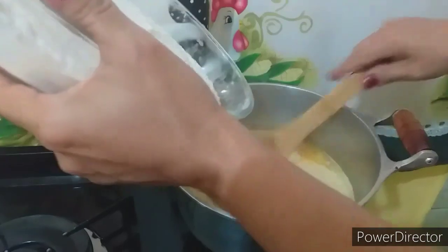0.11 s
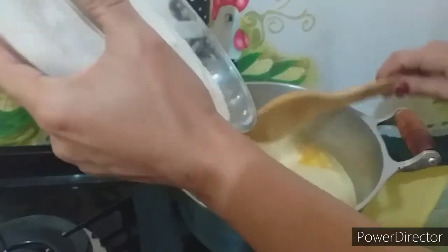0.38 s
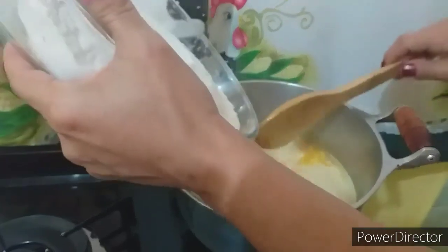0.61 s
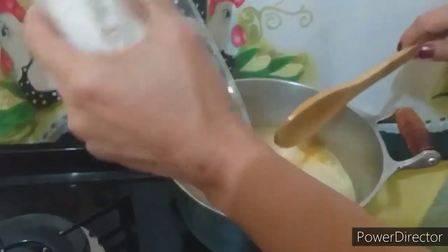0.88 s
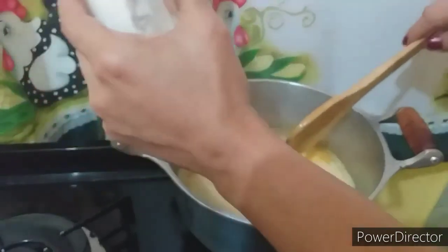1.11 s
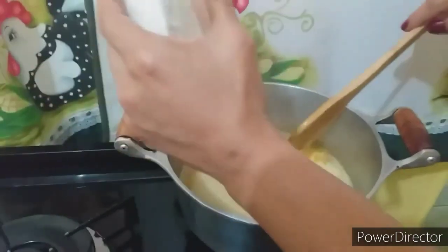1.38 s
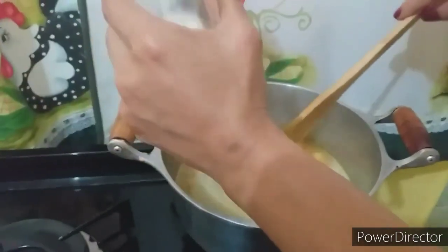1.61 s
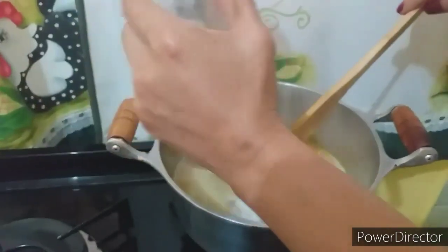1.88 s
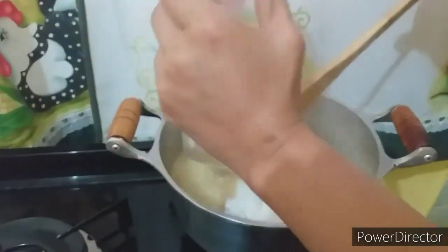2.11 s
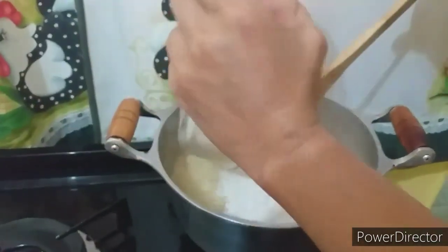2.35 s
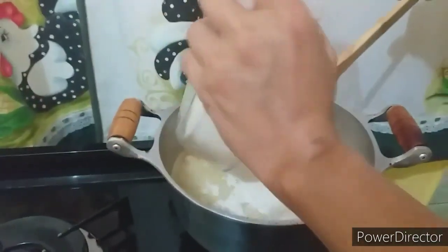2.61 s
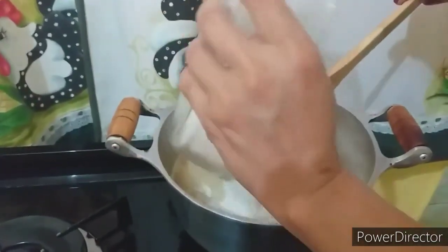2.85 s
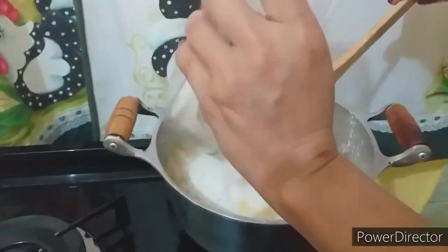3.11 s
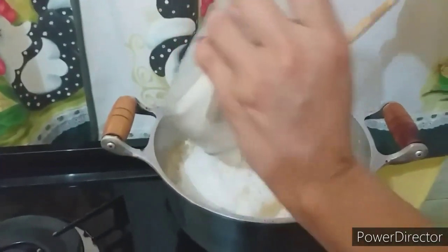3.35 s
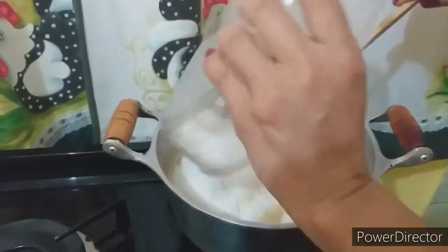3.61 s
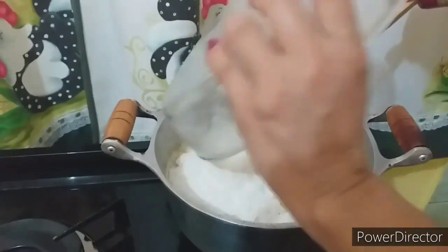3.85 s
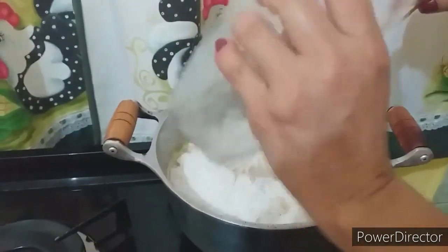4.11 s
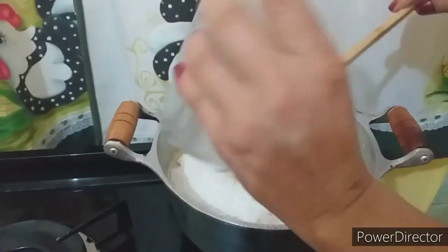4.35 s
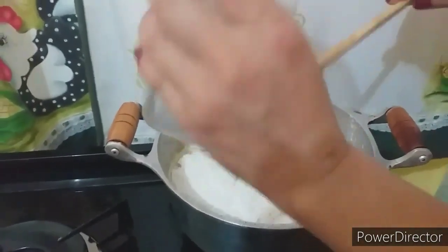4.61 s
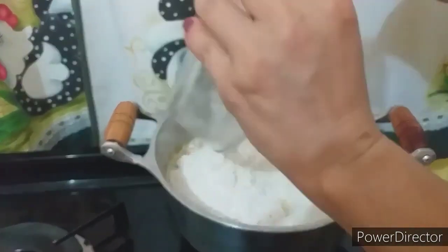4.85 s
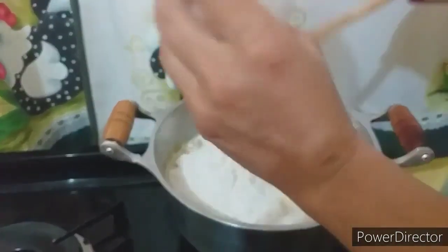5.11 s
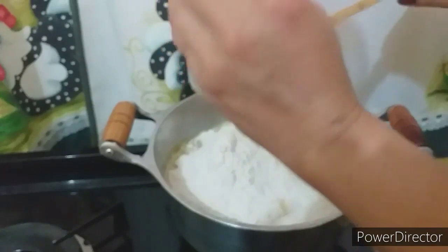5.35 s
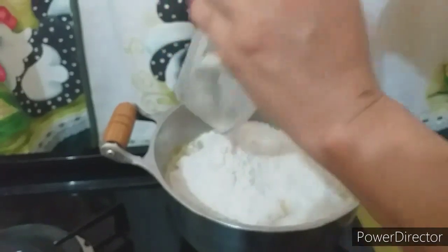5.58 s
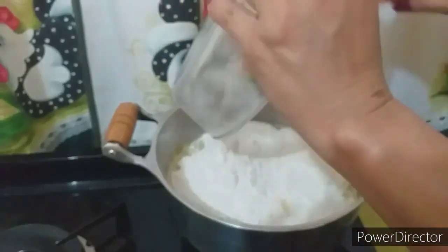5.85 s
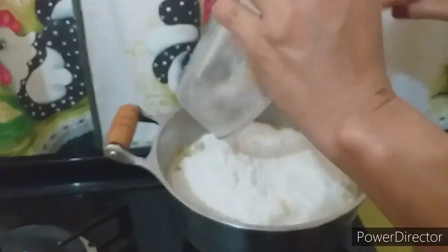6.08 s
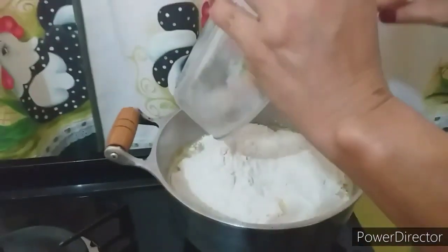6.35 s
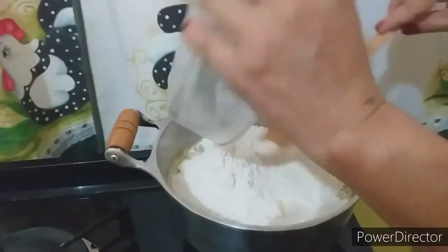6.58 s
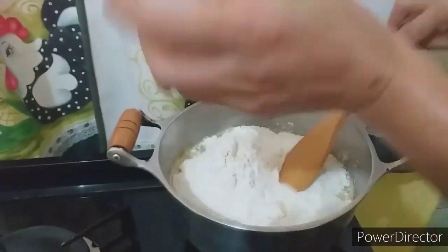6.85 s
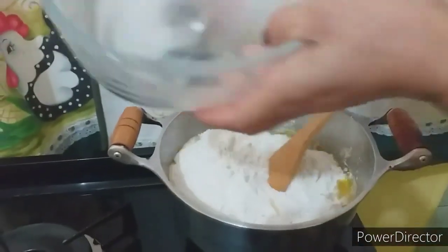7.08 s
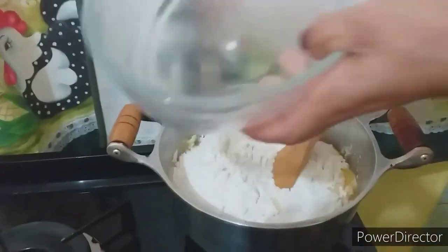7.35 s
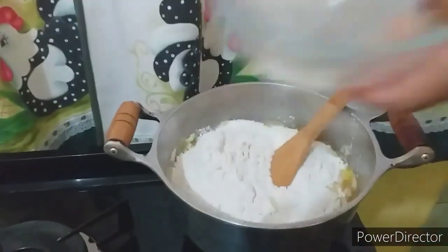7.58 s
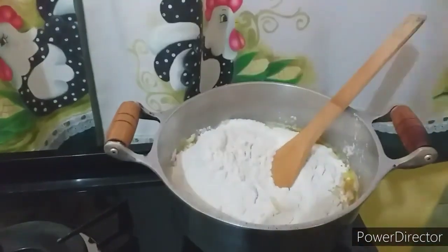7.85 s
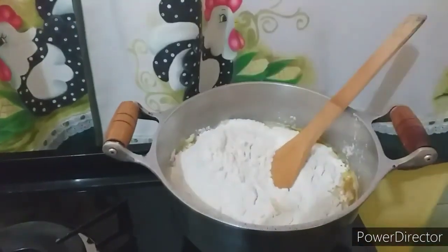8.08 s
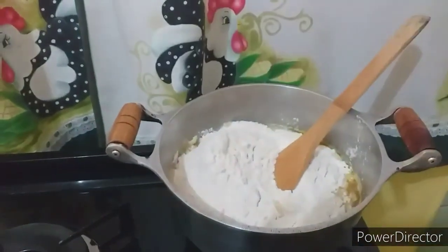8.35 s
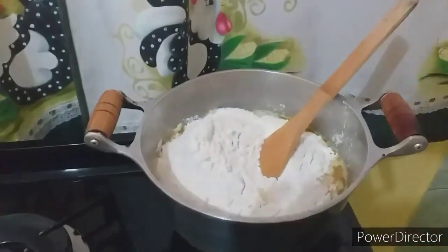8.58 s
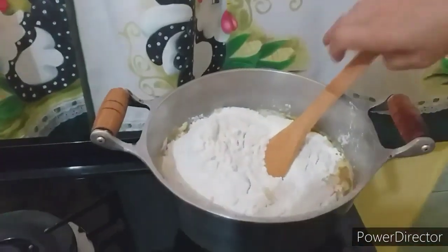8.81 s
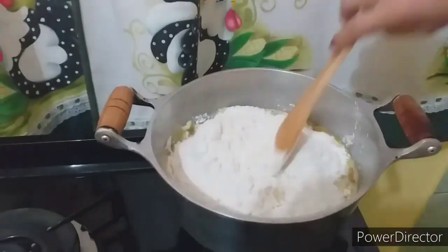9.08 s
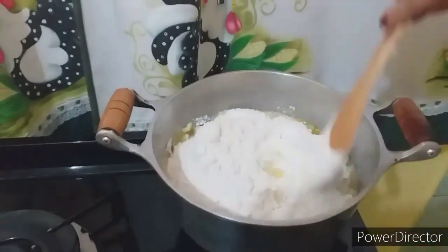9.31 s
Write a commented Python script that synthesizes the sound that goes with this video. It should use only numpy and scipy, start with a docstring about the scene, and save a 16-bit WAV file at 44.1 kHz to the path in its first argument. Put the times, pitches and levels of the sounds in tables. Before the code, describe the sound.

In a small hard kitchen, sparse dull pot knocks, then short glass taps, soft rustling, a counter thud and a final scraping knock over steady hum.

```python
"""Cooking in a small hard kitchen

A fridge compressor hums and throbs (sine waves) and a gas burner hisses under a pot (bands of noise).
A wooden spoon knocks the pot, then taps a glass bowl five times, with a fainter touch and light ticks.
Feet and sleeves shuffle (noise swells), the bowl is set down on a counter, and the spoon scrapes into
the pot again. Every blow is a set of dying sine waves plus a noisy crack, and echoes in the room."""
import sys
import numpy as np
from scipy import signal
from scipy.fft import rfft, irfft
from scipy.io import wavfile
from scipy.ndimage import uniform_filter1d

SR = 44100
rng = np.random.default_rng(int(sys.argv[2]) if len(sys.argv) > 2 else 0)


def decibels_to_gain(level_db):
    """Convert a level in decibels to a linear amplitude gain (20 dB per decade)."""
    exponent = np.asarray(level_db, float) / 20
    return 10 ** exponent


def to_wav(sig):
    """Store sig (one row per channel, or 1-D mono) as 16-bit WAV at the path in sys.argv[1].

    Samples outside -1..1 are clipped; the rate is SR.
    """
    pcm = np.clip(np.atleast_2d(sig), -1, 1) * 32767
    pcm = np.round(pcm).astype(np.int16)
    wavfile.write(sys.argv[1], SR, pcm.T)  # frames by channels


N = 416744  # length in samples
T = np.arange(N) / SR  # time of every sample, s


def curve(table):
    """Joins the (time in s, value) points of a table with straight lines, one value per sample."""
    return np.interp(T, *np.transpose(table))


def noise(gain):
    """Noise of rms 1 whose amplitude at each frequency follows gain(Hz)."""
    hz = np.maximum(np.arange(N // 2 + 1) * SR / N, 1)
    x = irfft(rfft(rng.standard_normal(N)) * gain(hz), N)
    return x / x.std()


def points(table):
    """Gain that passes through (Hz, dB) points, joined along a log frequency axis."""
    hz, db = np.transpose(table)
    return lambda f: decibels_to_gain(np.interp(np.log(f), np.log(hz), db))


def hump(hz, width):
    """Gain of a resonance applied twice: 1 at its centre, one half at the edges of its width."""
    return lambda f: 1 / (1 + (2 * (f - hz) / width) ** 2)


def walk(rate):
    """Random wavering: random levels held for 1 / rate seconds, then smoothed twice."""
    hold = int(SR / rate)
    steps = np.repeat(rng.standard_normal(N // hold + 1), hold)
    return uniform_filter1d(uniform_filter1d(steps, hold), hold)[:N]


def fridge():
    """Harmonics of the compressor shaft; its slipping motor lets the magnetic pull beat against them."""
    # turning speed of the shaft: t/s, turns per second/Hz
    shaft_speed = [(0, 58.24), (2, 58.255), (7, 58.34), (9.45, 58.335)]
    # hum at whole multiples of the shaft speed: multiple, level/dB rms (wavers a little)
    harmonics = [(1, -60.5), (2, -62.5), (3, -51), (4, -66.5), (5, -67), (6, -64), (7, -68.5), (8, -73),
                 (9, -75), (10, -71.5), (11, -79.5)]
    # tones that throb against a harmonic: multiple, level/dB rms, first moment in step with it/s
    throbs = [(2, -59, 0.25), (3, -58, 0.19), (7, -71, 0.21), (10, -73.5, 0.21)]
    pull_hz = 119.97  # the magnets pull at twice the mains frequency

    shaft = 2 * np.pi * np.cumsum(curve(shaft_speed)) / SR
    beat = 2 * np.pi * pull_hz * T - 2 * shaft
    lag = rng.uniform(0, 2 * np.pi, len(harmonics) + 1)
    tones = 0
    for k, db in harmonics:
        tones = tones + decibels_to_gain(db + 1.0 * walk(1.3)) * np.sin(k * shaft + lag[k])
    for k, db, s in throbs:
        # both tones are in step at time s, so they add up there
        beat_from_s = beat - np.interp(s, T, beat)
        tones = tones + decibels_to_gain(db) * np.sin(k * shaft + lag[k] + beat_from_s)
    return np.sqrt(2) * tones  # a sine of rms 1 has a peak of sqrt(2)


def room_air():
    """Dull rumble of the room: shaped noise that wavers slowly in level."""
    # loudness of the rumble across pitch: f/Hz, relative level/dB
    air_shape = [(18, -53), (30, -21), (123, -9), (177, -9.5), (224, -12), (399, -10.5), (995, -27),
                 (1910, -47.5), (3490, -40), (4420, -34.5), (5590, -30), (8270, -31.5), (10200, -38.5),
                 (13900, -41.5), (15500, -59)]
    return decibels_to_gain(-58 + 0.99 * walk(2.44)) * noise(points(air_shape))


def burner():
    """Flame hiss: a few broad bands of noise that each waver alone, swelling and sinking together."""
    # bands of the hiss, lowest first: f/Hz, width/Hz, level/dB before the changes below
    bands = [(275.7, 30, -65), (1440, 530, -89.5), (1970, 780, -67), (4736, 1300, -67.5), (8470, 160, -76),
             (14020, 1400, -79.5)]
    # swelling of the whole hiss: t/s, level change/dB
    swells = [(0, 1), (2.5, -1.5), (4, -0.7), (5, .5), (6.2, -2.3), (8, 1.5), (9.45, 2.5)]

    # the second band, near 1.4 kHz, flares up by 23 dB at 1.73 s, then fades by 6.5 dB per s
    since_flare = T - 1.73
    flare_db = np.maximum(23 - 6.5 * since_flare, 0) * np.clip(since_flare / 0.1, 0, 1)
    # the highest band is 3.5 dB stronger at first and settles around 2.5 s
    top_db = 3.5 * np.clip((2.5 - T) / 0.4 + 0.5, 0, 1)
    extra_db = [0, flare_db, 0, 0, 0, top_db]

    flame = 0
    for (hz, width, db), extra in zip(bands, extra_db):
        flame = flame + decibels_to_gain(db + extra + 2.2 * walk(3.4)) * noise(hump(hz, width))
    return decibels_to_gain(curve(swells)) * flame


def whines():
    """Faint thin whistles: very narrow bands of noise, each wavering alone."""
    # the whistles: f/Hz, width/Hz, level/dB rms before wavering
    whistles = [(1472, 18, -79), (1914, 17, -78), (4476, 45, -75.5), (8400, 68, -92), (10950, 60, -87.5)]
    return sum(decibels_to_gain(db + 1.6 * walk(2.6)) * noise(hump(hz, width)) for hz, width, db in whistles)


def shuffles():
    """Feet and sleeves rub: soft swells of noise, made grainy by fast random level changes."""
    # one swell per row: t/s of its top, rise/s, fall/s, level at the top/dB before the graininess
    moves = [(5.88, 0.056, 0.057, -57.5), (7.0, 0.14, 0.17, -64.5), (7.57, 0.067, 0.13, -56.5),
             (8.07, 0.053, 0.12, -55.5), (8.48, 0.11, 0.16, -57.5), (9.0, 0.082, 0.27, -60.5)]
    # loudness of the rubbing across pitch: f/Hz, relative level/dB
    rub_shape = [(880, -51), (1500, -17), (1860, -19), (2620, -16.5), (5500, -12.5), (6680, -16),
                 (8620, -19), (15500, -27.5)]
    swell = 0
    for s, rise, fall, db in moves:
        swell = swell + decibels_to_gain(db) * np.exp(-((T - s) / np.where(T < s, rise, fall)) ** 2)
    return swell * decibels_to_gain(2.2 * walk(90.0)) * noise(points(rub_shape))


def scrape():
    """Wood slips along the metal rim and excites a few bright bands in quick random bursts."""
    # strength of the scraping: t/s, level/dB before the bands' own levels
    strength = [(9.385, -71), (9.402, -55.5), (9.42, -51), (9.45, -45)]
    # bright bands of the rim: f/Hz, width/Hz, relative level/dB
    rim_bands = [(2300, 930, 1.5), (6600, 1200, 3.5), (12400, 2300, -7.5)]
    bands = sum(decibels_to_gain(db) * noise(hump(hz, width)) for hz, width, db in rim_bands)
    started = T > strength[0][0]
    return decibels_to_gain(curve(strength) + 3.6 * walk(300.0)) * bands * started


def room(x):
    """Reflections thicken over a few ms, the bass later, then each octave dies away at its own pace."""
    # time for the echo to fall by 60 dB: f/Hz, t/s
    fall_times = [(150, 0.46), (500, 0.5), (1500, 0.37), (4000, 0.59), (10000, 0.21)]
    build_s, bass_build_cycles = 0.0042, 1.6
    t = np.arange(SR) / SR
    hz, t60 = np.transpose(fall_times)
    tail = 0
    for f in 90 * 2 ** np.arange(0, 7.5):
        octave = signal.butter(2, [f / np.sqrt(2), f * np.sqrt(2)], "bandpass", fs=SR, output="sos")
        echoes = signal.sosfilt(octave, rng.standard_normal(SR))
        decay = 1000 ** (-t / np.interp(np.log(f), np.log(hz), t60))
        build = 1 - np.exp(-(t / (build_s + bass_build_cycles / f)) ** 2)
        tail = tail + echoes * decay * build
    return signal.fftconvolve(x, tail / np.sqrt(np.sum(tail ** 2)))[:N]


def strike(blows, modes, excite, crack_db, crack_s, room_db, room_hz):
    """Each blow rings the object's modes anew and adds a short crack, both coloured by place and hardness.

    Returns two rows: the direct sound and the share sent into the room."""
    hz, db, t60 = (column[:, None] for column in np.transpose(modes))
    at_hz, plain_db, *extra_db = np.transpose(excite)
    t = np.arange(SR // 2) / SR
    f = np.maximum(np.arange(len(t) // 2 + 1) * SR / len(t), 1)
    out = np.zeros(N + SR)
    for s, strength_db, hard_db, *shares in blows:
        # a hard blow favours the treble
        tilt_db = hard_db * np.log2(np.clip(at_hz, 300, 5000) / 1000)
        place_db = sum(share * extra for share, extra in zip(shares, extra_db))
        colour = points(np.c_[at_hz, strength_db + plain_db + tilt_db + place_db])

        # no two blows excite the modes exactly alike
        gain = decibels_to_gain(db + 1.2 * rng.standard_normal(hz.shape)) * colour(hz)
        decay = np.exp(-np.log(1000) * t / np.abs(t60))
        ring = (gain * decay * np.sin(2 * np.pi * hz * t)).sum(0)

        # the crack has equal energy per octave before the colour
        grit_gain = colour(f) * np.sqrt(SR / 2 / f)
        grit = irfft(rfft(rng.standard_normal(len(t))) * grit_gain, len(t))
        crack = decibels_to_gain(crack_db) * grit * np.exp(-t / crack_s)

        contact = 1 - np.exp(-(t / 0.00059) ** 2)  # the touch takes a moment to build
        i = int(s * SR)
        out[i:i + len(t)] += (ring + crack) * contact
    # small objects radiate little bass
    direct = signal.sosfilt(signal.butter(2, 130, "highpass", fs=SR, output="sos"), out[:N])
    # the treble beams at the phone, so the room gets a duller share
    duller = signal.sosfilt(signal.butter(1, room_hz, fs=SR, output="sos"), direct)
    return np.array([direct, decibels_to_gain(room_db) * duller])


def set_down():
    """The bowl lands and rocks: a few blows ring the counter top under it, and the bowl itself."""
    # the blows: t/s, strength/dB, hardness/dB per octave
    landings = [(8.767, -30, 5), (8.770, -17.5, -2), (8.782, -19.5, 2.5)]
    # ringing of the counter top, and at 1619 Hz of the bowl itself: f/Hz, relative level/dB, time to fall by 60
    # dB/s
    modes = [(141, 8, .5), (205, 4, .15), (328, 1, .12), (423, -5, .08), (525, 0, .07), (636, -4, .06),
             (700, -3, .06), (775, 3, .09), (860, -3, .06), (935, -2, .07), (1010, 1, .08), (1130, -3, .06),
             (1619, 13, .18), (2300, -5, .04), (3200, -5, .04)]
    # how the blows excite it: f/Hz, level/dB
    colour = [(70, -39), (160, -20.5), (350, -7.5), (700, 2), (1400, -20.5), (2700, -31), (5500, -39),
              (15000, -70)]
    return strike(landings, modes, colour, crack_db=7.5, crack_s=0.0051, room_db=-0.5, room_hz=5000)


def pot_knocks():
    """The spoon knocks a filled pot, whose ringing dies fast because the batter damps it."""
    # the knocks: t/s, strength/dB, hardness/dB per octave, on the rim/0-1, muffled/0-1
    knocks = [(.4199, -31.5, 1, 0.15, 0), (.5633, -36.5, 1, 0.06, 0.85), (.602, -30.5, 0.5, 0.02, 0.07),
              (3.125, -44.5, -3, 0.3, 0.6), (3.1356, -46.5, -1, 0.4, 0.25), (7.436, -30.5, 0.5, 0, 1),
              (9.421, -41, 5, 0.8, 0.06), (9.427, -33, 6, .95, 0), (9.4337, -34.5, 0, .95, 0),
              (9.4414, -25.5, 0, .95, 0.25), (9.4454, -16, 1.5, 0.97, 0)]
    # ringing of the pot: f/Hz, relative level/dB, time to fall by 60 dB/s
    modes = [(200, 0, .05), (270, 2, .03), (460, 1, .025), (600, 0, .025), (1250, 4, .025), (1550, 2, .02),
             (2300, 0, .015), (4550, 1, .01), (5200, 0, .008), (6600, -1, .008)]
    # how knocks excite it: f/Hz, on the wall/dB, extra on the rim/dB, extra when muffled/dB
    colour = [(75, -31, 0, 3), (305, 0.5, -2, 1), (540, 1.5, -6, -16.5), (850, -12.5, 11, 9),
              (1330, 0, 0, -19), (3260, -15.5, 5, -18), (4600, 2, -20, -6.5), (15000, -25, -14, -9)]
    return strike(knocks, modes, colour, crack_db=1.0, crack_s=0.0034, room_db=-3.5, room_hz=3040)


def ticks():
    """Light ticks of spoon on glass: tiny bright bursts of noise, a few ms each."""
    # the ticks: t/s, starting level/dB, fall/s
    touches = [(3.926, -51, 0.0026), (5.218, -42.5, 0.0037), (6.1265, -37.5, 0.003)]
    # loudness of a tick across pitch: f/Hz, relative level/dB
    tick_shape = [(3000, -49), (4800, 1.5), (6000, -1), (9000, -1.5), (13000, -8), (15500, -19)]
    burst = 0
    for s, db, fall in touches:
        burst = burst + decibels_to_gain(db) * np.exp(-np.maximum(T - s, 0) / fall) * (T >= s)
    direct = burst * noise(points(tick_shape))
    return np.array([direct, decibels_to_gain(-3) * direct])  # direct sound and the room's share


def bowl_taps():
    """The spoon taps the glass bowl; the place and the muffling decide which modes ring."""
    # the taps: t/s, strength/dB, hardness/dB per octave, on the belly/0-1, muffled/0-1
    taps = [(5.1508, -25, 8, 0, 0.33), (5.219, -48, 12, .05, 0.34), (5.7833, -24, -0.5, 0.42, 0),
            (6.1252, -23.5, 0.5, 0.92, 0.04), (6.3514, -27, -1.5, 0.96, 0.67),
            (6.5617, -27.5, 1.5, .95, 0.96)]
    # pitches of the ringing glass: f/Hz
    mode_hz = [522, 637, 985, 1324, 1366, 1617, 1940, 2187, 2213, 2285, 2360, 2430, 2498, 2566, 2972, 3200,
               3950, 4398, 4441, 5356, 5770, 6675, 7138]
    # ringing at each of those pitches: relative level/dB, time to fall by 60 dB/s
    mode_ring = np.array([(-50, .06), (-2.5, 0.11), (-12, 0.048), (-22, 0.31), (-2.0, 0.076), (-4.0, 0.13),
                 (-8, 0.12), (2.5, 0.084), (-3.0, 0.042), (-3, 0.097), (-0.5, 0.12), (-5.5, 0.086),
                 (5.5, 0.045), (-14, 0.25), (-8, 0.028), (1, 0.064), (-1, 0.025), (-4, 0.041),
                 (-2.0, 0.098), (-12, 0.087), (-6, 0.031), (-10, 0.041), (-12, 0.053)])
    # how taps excite it: f/Hz, on the rim/dB, extra on the belly/dB, extra when muffled/dB
    colour = [(161, -19, 5, 2), (630, 0.5, -4, 3), (910, -22, 34, 1), (1360, 3, 8.5, -9.5),
              (1580, -3.5, 11.5, -13), (2370, -5.5, 3.5, -26.5), (3180, -7.5, 1, -26),
              (4600, -11, 1.5, -13.5), (15000, -27.5, -3, -4)]
    modes = np.c_[mode_hz, mode_ring]
    return strike(taps, modes, colour, crack_db=6, crack_s=0.00089, room_db=-7.0, room_hz=12000)


def scene():
    """Adds all sources together; the blows and ticks also echo in the room."""
    direct, to_room = bowl_taps() + pot_knocks() + set_down() + ticks()
    blows = direct + room(to_room)
    background = fridge() + burner() + whines() + room_air()
    rubbing = shuffles() + scrape()
    return (blows + background + rubbing)[None]


def band_limit(x):
    """A steep low-pass at the top of the band."""
    return signal.sosfilt(signal.butter(12, 15630, fs=SR, output="sos"), x)


def record(dry):
    """The phone adds its own faint hiss and drops the deepest bass."""
    heard = dry + decibels_to_gain(-79) * rng.standard_normal(N)
    mix = signal.sosfilt(signal.butter(4, 45, "highpass", fs=SR, output="sos"), heard)
    return band_limit(mix)


dry = scene()
out = record(dry)
to_wav(out)
```